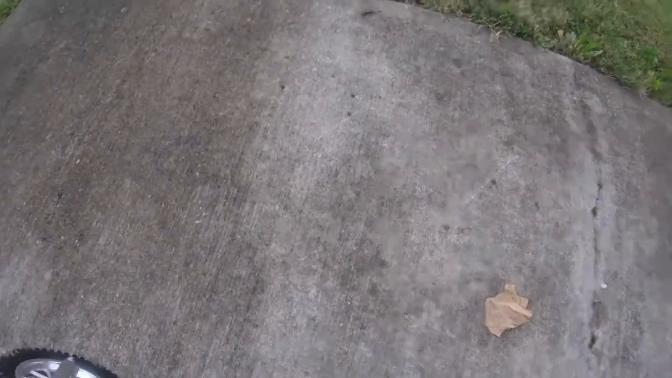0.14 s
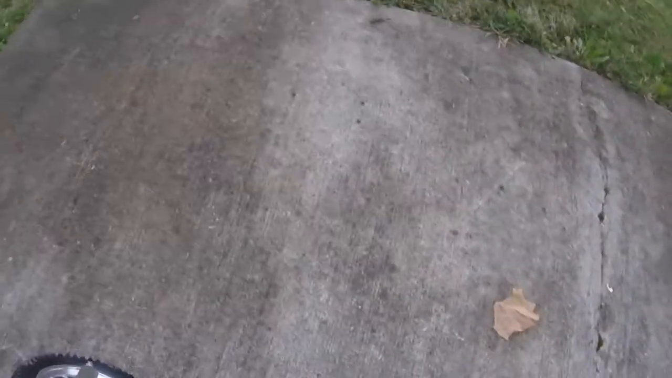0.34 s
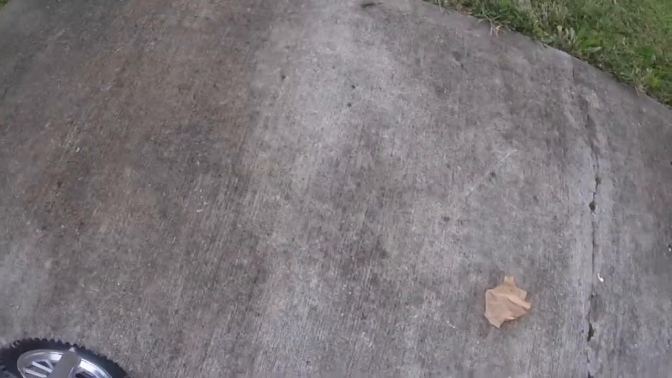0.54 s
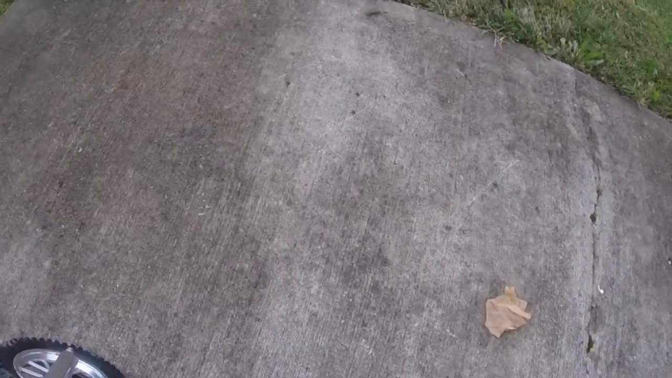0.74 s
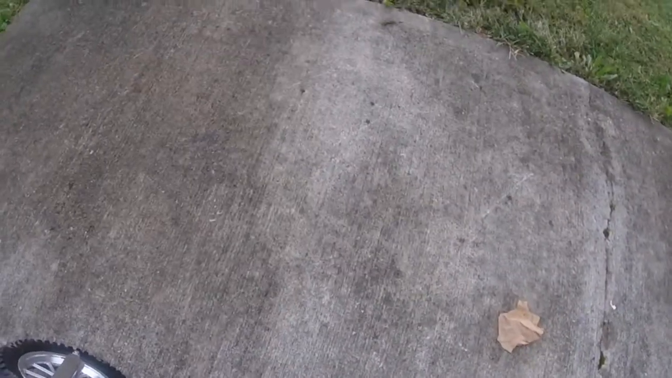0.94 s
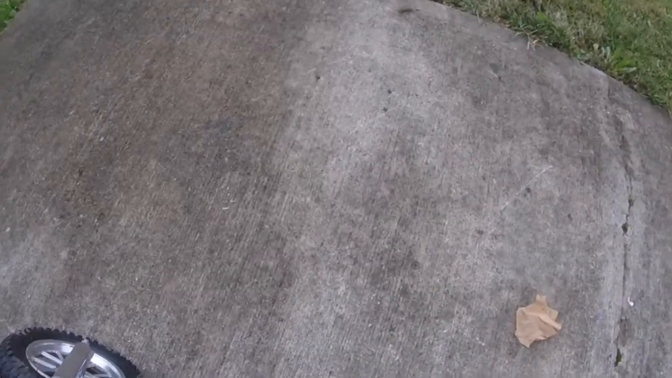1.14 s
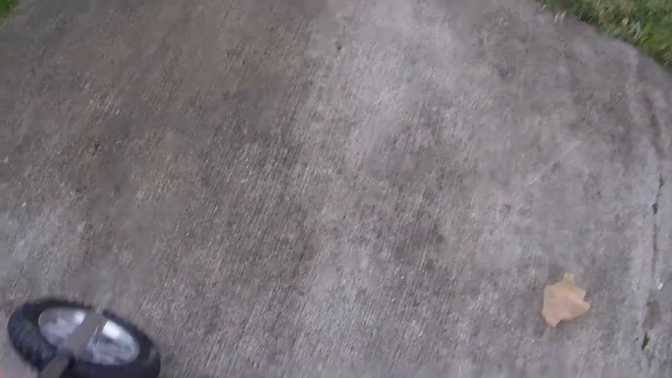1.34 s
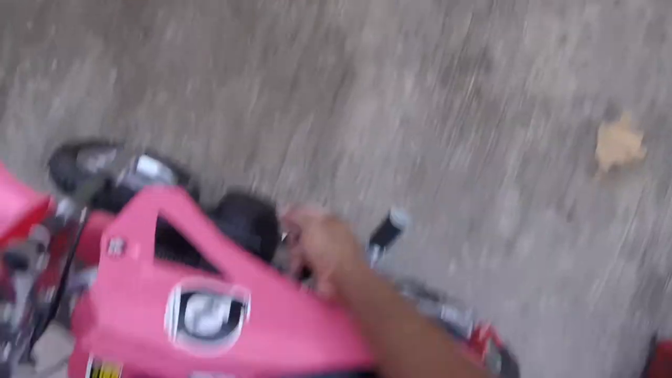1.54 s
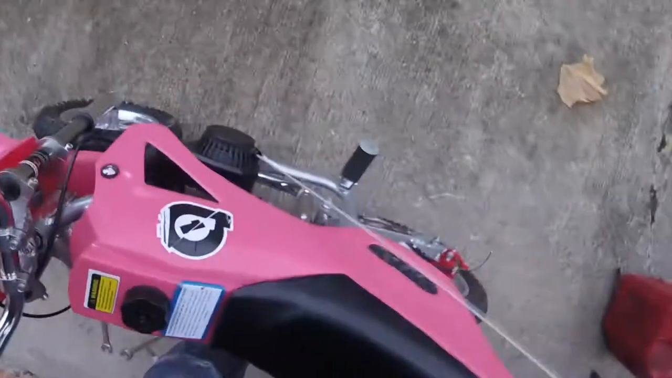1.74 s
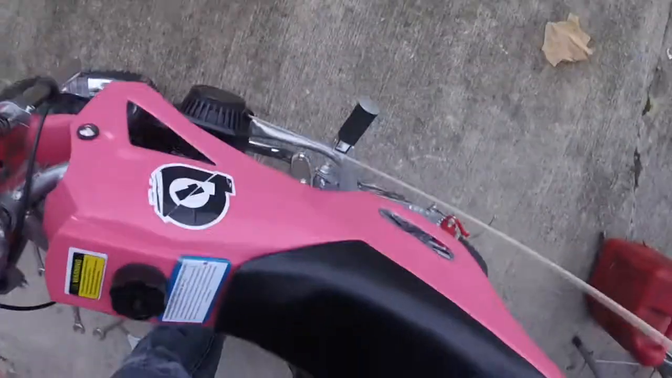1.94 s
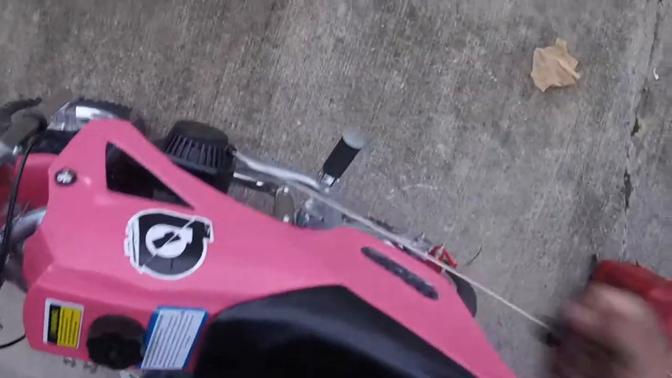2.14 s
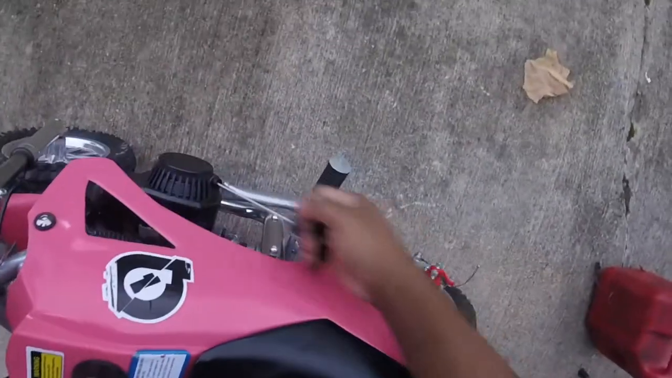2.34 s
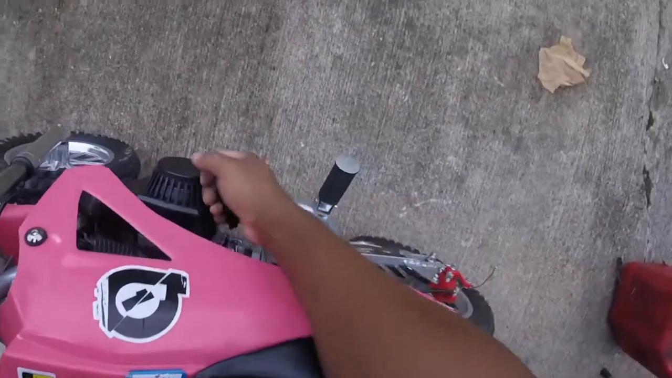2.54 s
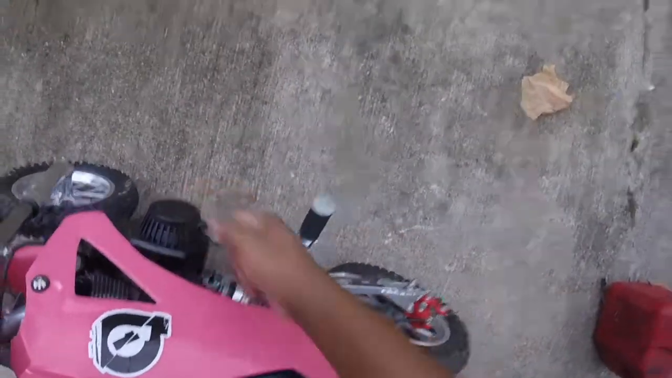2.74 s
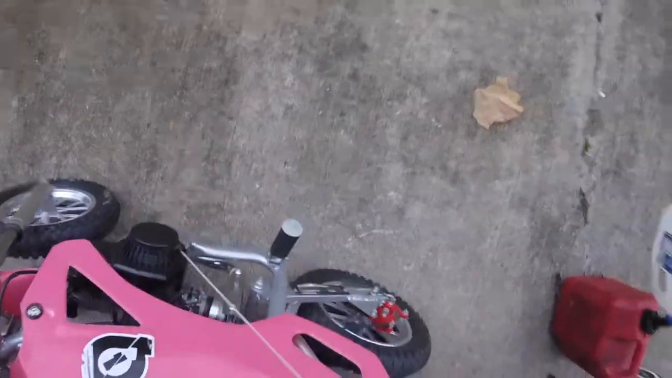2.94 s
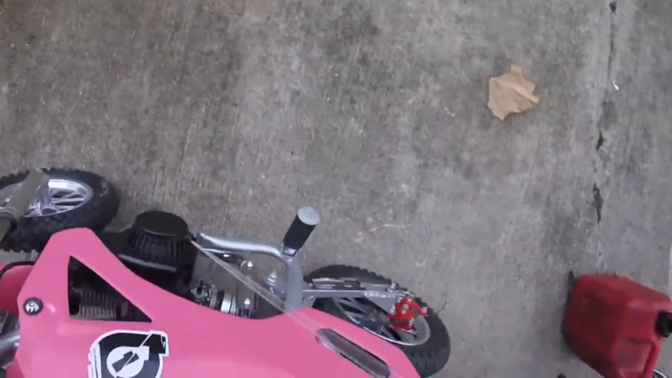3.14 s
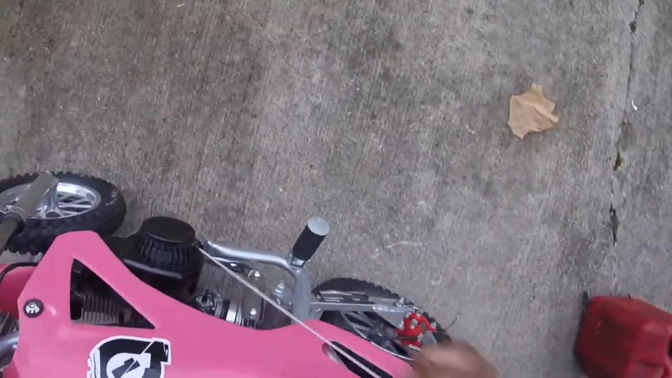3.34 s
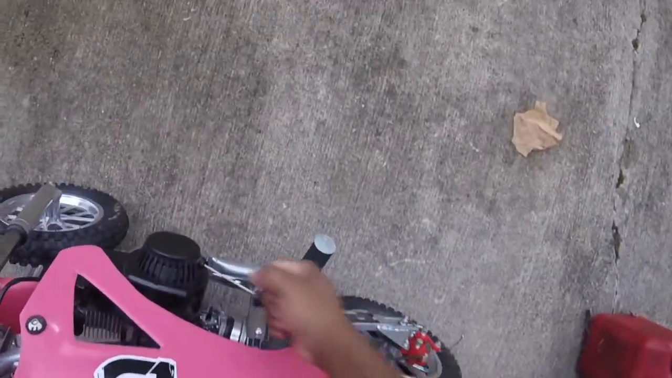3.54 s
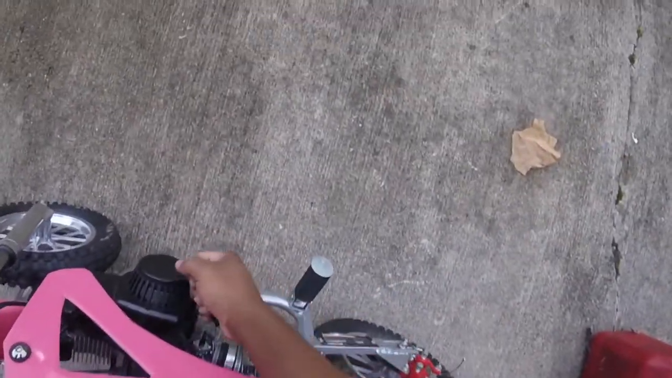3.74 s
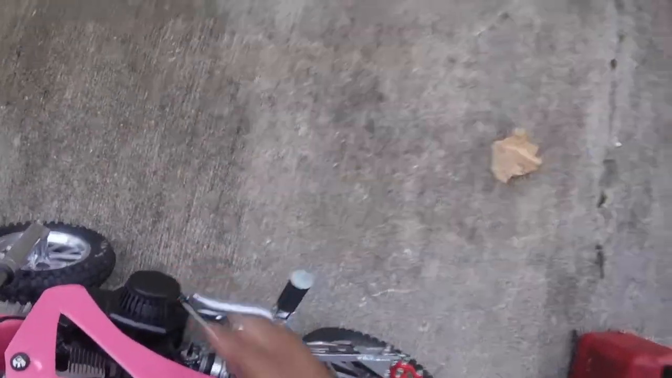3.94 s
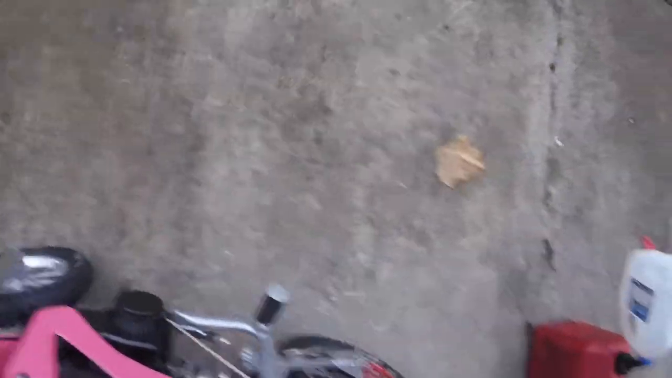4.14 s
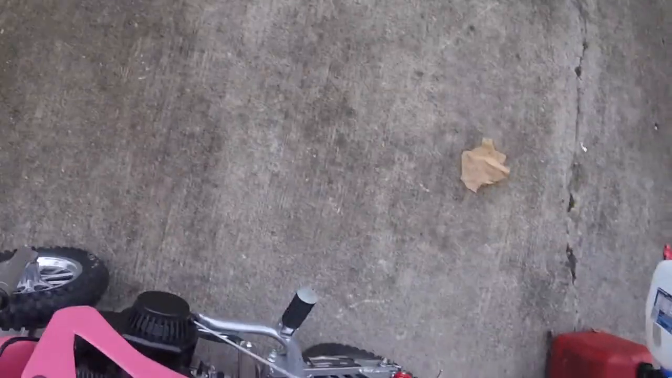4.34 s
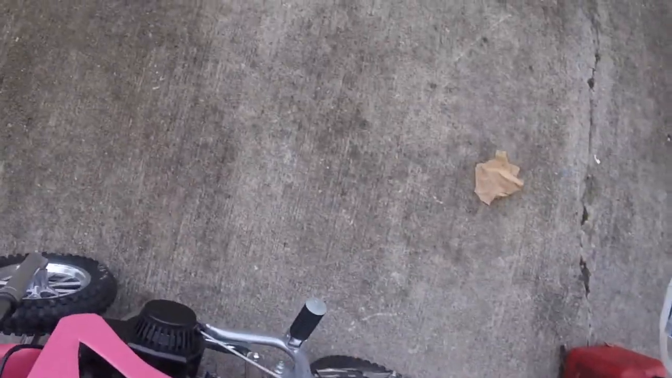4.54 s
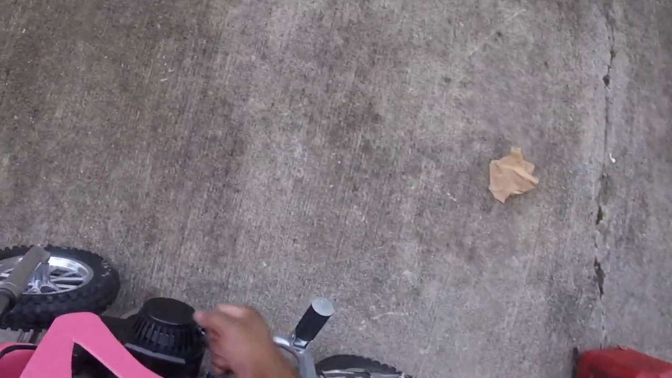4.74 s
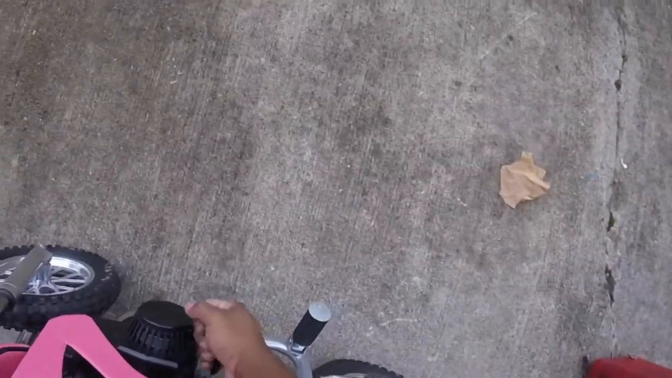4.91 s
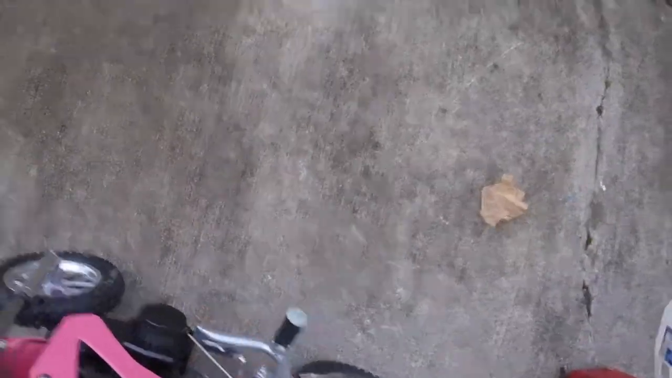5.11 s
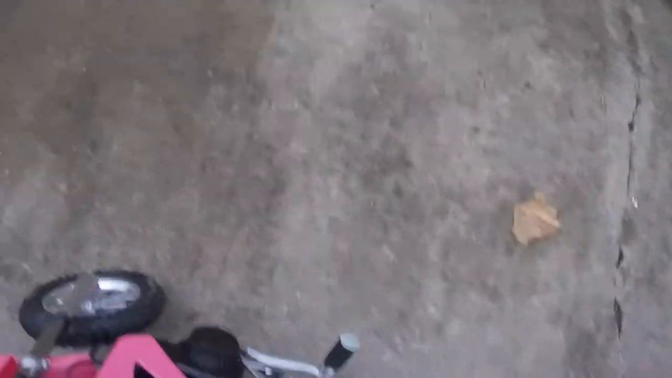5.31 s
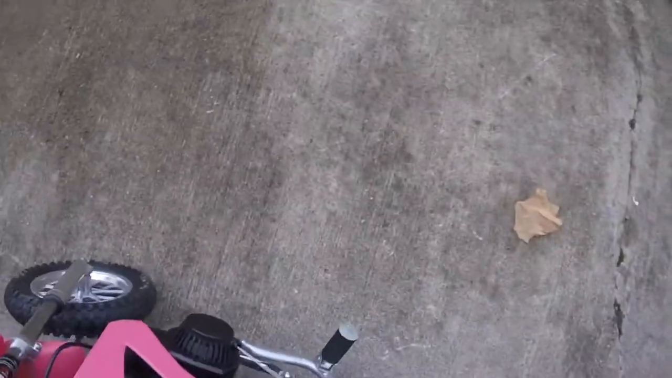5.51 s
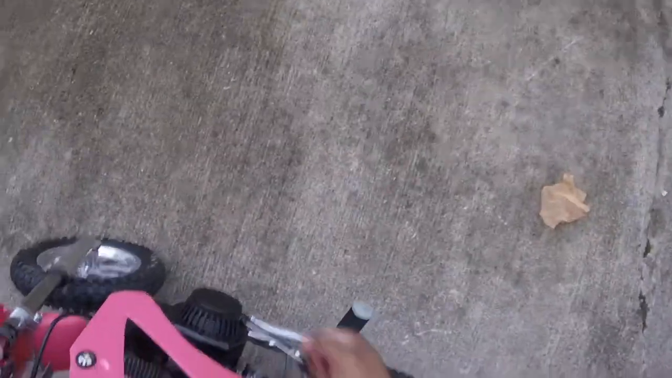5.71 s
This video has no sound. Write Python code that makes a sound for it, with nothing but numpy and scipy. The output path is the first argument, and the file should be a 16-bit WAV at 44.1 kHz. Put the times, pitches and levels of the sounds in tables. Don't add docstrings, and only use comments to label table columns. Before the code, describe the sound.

Close to the microphone on a concrete drive, a small dirt bike engine is pull-started five times. Each tug gives knocks, a rough rope rasp and a burst of blunt, hollow puffs, then a rattle and bright steel clicks slowing as the cord winds back. The engine never catches; the yard stays quiet with a light breeze.

```python
import sys
import numpy as np
from scipy import signal
from scipy.io import wavfile
from scipy.ndimage import uniform_filter1d

SR = 44100
rng = np.random.default_rng(int(sys.argv[2]) if len(sys.argv) > 2 else 0)


def nominal_scale(level):
    x = np.asarray(level, float) / 20
    return 10 ** x


def to_wav(sig):
    pcm = np.clip(np.atleast_2d(sig), -1, 1) * 32767
    pcm = np.round(pcm).astype(np.int16)
    wavfile.write(sys.argv[1], SR, pcm.T)


N = 258773


def evened(x):
    return x / np.sqrt(np.mean(x ** 2) + 1e-20)


def add(mix, s, sound):
    part = mix[max(round(s * SR), 0):][:len(sound)]
    part += sound[:len(part)]


def colour(x, points):
    f, db = np.transpose(points)
    bins_hz = abs(np.fft.fftfreq(4096, 1 / SR))
    log_gain = np.log(nominal_scale(np.interp(np.log(bins_hz + 1), np.log(f), db)))
    taps = np.fft.ifft(np.exp(np.conj(signal.hilbert(log_gain)))).real[:2048]
    return signal.oaconvolve(x, taps / np.linalg.norm(taps))[:len(x)]


def resonate(x, hz, width):
    r = np.exp(-np.pi * width / SR)
    angle = 2 * np.pi * hz / SR
    rung = signal.lfilter([np.sqrt(1 - r ** 2)], [1, -2 * r * np.cos(angle), r * r], x)
    return rung * 2 * np.sin(angle)


def ringing(modes, seconds):
    t = np.arange(round(seconds * SR)) / SR
    return sum(nominal_scale(db - 60 * t / t60) * np.cos(2 * np.pi * hz * t) for hz, db, t60 in modes)


def chatter(ms, swell, tail, tail_ms, grit_db):
    t = np.arange(4000) / SR * 1000
    ms = np.clip(ms, 1.3, 40)
    top = min(swell * ms, 3.8)
    spread = np.where(t < top, 1.24 * top, 1.06 * ms)
    main = np.exp(-((t - top) / spread) ** 2)
    shape = (1 - np.exp(-t / 1.44)) * (main + tail * np.exp(-t / tail_ms))
    noise, grit = rng.standard_normal((2, len(t)))
    return shape * noise * nominal_scale(grit_db * evened(uniform_filter1d(grit, size=30)))


# frequency in Hz, density in dB per Hz.
YARD = [(88, -19), (150, -0.5), (1010, -4.5), (1220, -5.5), (1720, -7), (4350, -30.5), (6610, -9),
        (10400, -26), (11600, -24), (15100, -28.5), (22000, -120)]


def quiet_yard():
    return nominal_scale(-55.5) * evened(colour(rng.standard_normal(N), YARD))


# middle in seconds, half width in seconds, level in dB.
GUSTS = [(.08, 0.15, -43), (1.2, 0.2, -44.5), (1.47, 0.082, -41.5), (2.43, 0.042, -34.5), (2.62, 0.23, -42),
         (3.7, 0.14, -42), (3.95, .05, -51), (4.7, 0.065, -35.5), (.2, 0.032, -29), (.58, 0.061, -38),
         (4.36, 0.048, -28.5), (5.46, 0.058, -30.5)]
# frequency in Hz, density in dB per Hz.
AIR = [(15, -3.5), (45, -2.5), (90, -12), (200, -18.5), (500, -26.5), (1300, -87.5), (3000, -120)]


def breeze():
    t = np.arange(N) / SR
    gust_db = np.max([db - 6 * ((t - s) / width) ** 2 for s, width, db in GUSTS], axis=0)
    still_db = -47.5
    return nominal_scale(np.maximum(gust_db, still_db)) * evened(colour(rng.standard_normal(N), AIR))


# start in seconds, level in dB, chatter in ms.
SLIPS = [(0, -37.5, 11), (.0168, -6, 4.5), (.0188, -1.5, 2), (.110, -34.5, 9.2), (.1255, -12.5, 2.3),
         (.3448, -16, 43), (.3875, -9, 3.7), (.405, -8, 7.1), (1.8608, -22, 9.2), (1.8827, -12, 7.2),
         (1.907, -13.5, 4.7), (2.7452, -9, 9.9), (3.034, -10, 12.5), (3.178, -15, 16), (3.899, -28, 8.7),
         (4.1992, -16, 44), (5.306, -12.5, 12)]
# time in seconds, level in dB,
# chatter in ms.
SKIPS = [(0.438, -9.5, 4), (0.4438, -1.5, 3.7), (.450, -3.5, 1.8), (0.4528, 1, 2.4), (.4575, 4.5, 1.1),
         (0.464, 3.5, 1.8), (0.4701, -5, 3.9), (0.4753, -1.5, 1.9), (.4775, -9, 1.8),
         (1.927, -10.5, 4.6), (1.938, -6.5, 5), (1.949, -1.5, 4.1), (1.96, -12.5, 5),
         (3.0584, 1, 3.6), (3.0629, 1, 1.5), (3.067, -9, 2.1), (3.077, -12, 2), (3.0855, -18, 2.9),
           (3.089, -2, 1.8), (3.102, -14, 1.6), (3.1105, -5, 2), (3.116, -8, 3), (3.1206, -5, 3.3),
           (3.132, -9, 3), (3.14, -2.5, 2.8), (3.144, 2.5, 0.81), (3.1506, 4.5, 1.3), (3.161, -13.5, 5),
         (4.2498, -5, 4.8), (4.2658, -6, 3.1), (4.2748, 7.5, 1.2),
         (5.33, 0.5, 4.4), (5.339, -5.5, 1.95), (5.345, -8.5, 2), (5.348, -12, 1.8), (5.355, 2.5, 2.7),
           (5.3648, -3, 2.9), (5.3663, -7, 1.2), (5.371, -11, 3)]
# start in seconds, level in dB, chatter in ms.
REWIND_1 = [(0.565, -8, 7.6), (0.585, -4, 4.7), (0.6075, -7, 8.3), (0.633, -10.5, 16.5), (0.67, -5, 6.5),
            (0.7086, -10, 11), (0.754, -9.5, 8.3), (0.7993, -7, 7.3), (0.848, -5, 5.2), (0.8938, -9, 12),
            (0.9483, -8, 7), (1.017, -8.5, 9.2), (1.1635, -7.5, 8.9)]
REWIND_2 = [(2.0742, -10, 5.4), (2.1018, -10.5, 5.1), (2.137, -15, 9.9), (2.168, -14, 13),
            (2.2008, -8.5, 7.6), (2.233, -9, 11.5), (2.2684, -10.5, 8.5), (2.3034, -8.5, 5.2),
            (2.338, -13, 10.6), (2.377, -10.5, 9.5), (2.4324, -9.5, 9), (2.494, -12, 8.1)]
REWIND_3 = [(3.2252, -15.5, 7.5), (3.266, -11.5, 8.2), (3.3122, -12, 5.8), (3.3512, -12, 8.2),
            (3.3975, -15, 8.7), (3.441, -12, 7.3), (3.492, -11, 5.2), (3.5415, -10.5, 7.8),
            (3.596, -12, 12), (3.6606, -11, 12.6), (3.743, -8, 9.1)]
REWIND_4 = [(4.3832, 0, 3.1), (4.3987, -8.5, 3.8), (4.419, -6.5, 6.6), (4.4463, -8, 9.5),
            (4.472, -1.5, 2.7), (4.4959, -7, 11.4), (4.526, -5.5, 6.4), (4.5554, -6.5, 5.2),
            (4.584, -10.5, 8.7), (4.616, -8.5, 15.4), (4.6509, -7, 7.2), (4.693, -8.5, 10.3),
            (4.7446, -7.5, 9.6), (4.8266, -7, 11.8)]
REWIND_5 = [(5.467, -3.5, 5.7), (5.4866, -3, 4.5), (5.504, 0.5, 4.6), (5.5268, -5.5, 4.1),
            (5.5455, -3.5, 6.8), (5.5711, -4.5, 6.6), (5.5972, -5.5, 5.6), (5.6264, -6.5, 8.7),
            (5.659, -5.5, 6.3), (5.691, -8, 10), (5.7271, -8.5, 10.7), (5.7801, -5, 6.1), (5.8306, -6, 9.3)]
REWINDS = (REWIND_1, REWIND_2, REWIND_3, REWIND_4, REWIND_5)
# time in seconds, rim strike in dB, loudest
# patch in Hz, cover in dB against the click.
LANDS = [(0.5683, 20.5, 6380, -14), (0.5868, 0, 6360, -22), (0.6087, -3, 6580, -30),
         (0.6356, -7, 6200, -14.5), (0.6711, 3, 6430, -41), (0.715, -9, 6170, -14),
         (0.7559, -12.5, 6600, -20.5), (0.8003, -6, 6600, -15.5), (0.8497, -3, 6550, -18),
         (0.8976, 6, 6580, -14.5), (0.9504, -11, 6540, -20), (1.0198, -5, 6540, -24.5),
         (1.1669, 3, 6150, -11),
         (2.0783, -14, 5930, -6), (2.1027, -14, 6720, -6), (2.1387, -16, 6100, 2),
           (2.1696, -14, 6230, -12), (2.206, -2, 6470, -7), (2.2389, -6, 6100, -4), (2.2714, -8, 6220, -2),
           (2.3088, 7, 6540, -14), (2.3402, -16, 6440, -2), (2.3821, -5, 6200, -2), (2.437, -15, 6300, -12),
           (2.4968, -7, 6190, -6),
         (3.2233, -14, 6030, -9.5), (3.2682, -10, 6380, -12.5), (3.3131, -8, 6240, -15),
           (3.356, -16, 6170, -15.5), (3.3999, -13, 6060, -13.5), (3.4423, -7, 6530, -13.5),
           (3.4927, 0, 6080, -14.5), (3.5446, -9, 6300, -13), (3.5975, -8, 6220, -17),
           (3.6678, -9, 6420, -15), (3.7456, 3.5, 6600, -9.5),
         (4.3848, 1, 6250, -12), (4.4237, -6, 6460, -17), (4.4457, -16, 6730, -17),
           (4.4741, -7, 6310, -15), (4.5006, -10, 6320, -33), (4.5275, -2, 6350, -12),
           (4.5594, -5, 6730, -15), (4.5864, -8, 6700, -13), (4.6178, -13, 6450, -17.5),
           (4.6517, -11, 6330, -12), (4.6956, -7, 6620, -13.5), (4.748, -12, 6280, -14),
           (4.8303, 4, 6490, -15),
         (5.4698, 1.5, 6370, -23), (5.4883, -3, 6480, -21), (5.5062, 0, 6430, -33),
           (5.5277, -1, 6800, -18), (5.5506, 2, 6430, -23), (5.5741, -2, 6400, -21), (5.601, -4, 6090, -15),
           (5.6304, -11, 6300, -13), (5.6604, -6, 6320, -22), (5.6928, -11, 6320, -9),
           (5.7302, -8, 6380, -8.5), (5.7826, -5, 6210, -16), (5.833, 4.5, 6440, -12)]
# spring rasp in dB, cup whine in dB,
# cover in dB against the click.
GRIP = [
    (-35.5, -23, 4),
    (-30.5, -26.5, 2),
    (-37.5, -32.5, 6),
    (-33.5, -26, 4.5),
    (-31.5, -26.5, 3.5),
]
PATCH_MIDDLE_HZ = 6380


def clicks():
    skips = SKIPS
    loose = SLIPS + [(s - 0.00093, db + 1, ms) for s, db, ms in skips]
    rows = []
    for (s, db, ms), (place, uneven) in zip(loose, rng.uniform(-1.1, 1, (len(loose), 2))):
        rows.append((s, db, ms, db, PATCH_MIDDLE_HZ + 200 * place, -17 - 12 * uneven))
    lands = LANDS
    for run, (_, _, grip_db) in zip(REWINDS, GRIP):
        for s, db, ms in run:
            _, rim_db, hz, cover_db = min(lands, key=lambda land: abs(land[0] - s))
            rows.append((s, db - 1, ms, rim_db, hz, cover_db + grip_db))
    return rows


# frequency in Hz, level in dB, t60 in
# seconds.
CUP = [(538, -31, .22), (1750, -40, .25), (2035, -43, .5), (3424, -38, .3), (3849, -41, .3),
       (4290, -38, .15), (4710, -40, .25), (5670, -28, .08), (5880, -20, .07), (6030, -14, .05),
       (6190, -15, .05), (6300, -14, .04), (6438, -12, .04), (6535, -20, .09), (6740, -16, .045),
       (7055, -20, .1),
       (5103, -48, .35), (7354, -30, .1), (7780, -25, .06), (8460, -29, .06), (9095, -20, .06),
          (9920, -26, .06), (10500, -27, .04), (10850, -21, .04), (11235, -34, .11), (11900, -18, .07),
          (12950, -31, .09), (13400, -36, .05)]
# time in seconds, treble in dB, long ring in dB.
FACING = [(0, -9, -24), (1.2, 2, -14), (1.95, 9, -6), (2.2, 10.5, -2), (2.5, 7, 2), (2.75, -1, 7.5),
          (3.75, 2, -3), (4.3, 0.5, -21), (4.83, 1, 5), (5.35, 2, 1), (5.87, 1, -1.5)]
# frequency in Hz, width in Hz, level in dB.
HOUSING = [(760, 220, -7), (1430, 110, -6), (2300, 250, -10), (2990, 200, -8), (3850, 190, 0),
           (4350, 260, 0)]
# frequency in Hz, density in dB per Hz.
TICK = [(300, -33.5), (3000, 5), (5500, 13), (7000, -26), (9000, 7), (11500, 4), (13200, -20),
        (15000, -30.5), (20000, -91)]
# frequency in Hz, density in dB per Hz.
ROPE = [(260, -32), (450, -2.5), (591, -1.5), (715, 7), (1320, -5), (1430, 5), (2460, -7.5), (6560, -6.5),
        (11600, -22.5), (15100, -52.5), (22000, -120)]


def ratchet():
    patch, cover, strike, *spots = np.zeros((9, N))
    rows = clicks()
    for (s, db, ms, rim_db, hz, cover_db), spot in zip(rows, rng.integers(0, len(spots), len(rows))):
        hit = chatter(ms, swell=0.54, tail=0.29, tail_ms=12.5, grit_db=1.5)
        add(spots[spot], s, nominal_scale(db) * hit)
        add(strike, s + .002, nominal_scale([rim_db + 23.0]))
        opposite = nominal_scale(-5) * resonate(hit, 2 * PATCH_MIDDLE_HZ - hz, 150)
        add(patch, s, nominal_scale(db) * (resonate(hit, hz, 150) + opposite))
        add(cover, s, nominal_scale(db + cover_db) * hit)
    s, *facing = np.transpose(FACING)
    treble_db, ring_db = (np.interp(np.arange(N) / SR, s, column) for column in facing)

    modes = CUP
    rung = np.zeros(N)
    for x, scatter_db in zip(spots, 4 * rng.standard_normal((len(spots), len(modes)))):
        cup = ringing([(hz, db + d, t60) for (hz, db, t60), d in zip(modes, scatter_db)], .35)
        rung += signal.oaconvolve(x, cup / np.linalg.norm(cup))[:N]
    treble = signal.sosfilt(signal.butter(4, 7900, "high", fs=SR, output="sos"), rung)
    rung += nominal_scale(treble_db - 4.0) * treble

    rim = resonate(nominal_scale(ring_db) * strike, 6138, 11)
    boxy = sum(nominal_scale(db) * resonate(cover, hz, width) for hz, width, db in HOUSING)
    tick = nominal_scale(treble_db) * colour(sum(spots), TICK)
    whole = nominal_scale(-14.5) * rung + nominal_scale(-26.0) * rim + nominal_scale(-12) * patch + nominal_scale(-23.0) * tick
    whole += nominal_scale(-19.0) * boxy + nominal_scale(-22.0) * colour(cover, ROPE)
    return signal.sosfilt(signal.butter(2, 450, "high", fs=SR, output="sos"), whole)


# frequency in Hz, level in dB, t60 in seconds.
FRAME = [(538, 0, .21), (640, -12, .2), (1750, -12, .25), (2035, -15, .45), (3424, -20, .25),
         (4290, -19, .25), (4710, -21, .35)]
# frequency in Hz, level in dB, t60 in seconds.
EDGE = [(6094, -4, .24), (6535, -6, .2), (7058, 0, .14), (9098, -6, .12), (11000, 0, .16), (11237, 6, .2),
        (11890, 14, .2)]
# time in seconds, frame in dB, cup edge in dB.
LAST = [
    (.019, -64, -52),
    (1.019, -50, -44),
    (1.166, -40, -40),
    (2.496, -48, -44),
    (2.747, -50, -44),
    (3.746, -42, -40),
    (4.83, -48, -42),
    (5.833, -48, -42),
]


def afterring():
    out = np.zeros(N)
    for s, frame_db, edge_db in LAST:
        sound = nominal_scale(frame_db) * ringing(FRAME, .35) + nominal_scale(edge_db) * ringing(EDGE, .35)
        add(out, s, sound * np.minimum(np.arange(len(sound)) / 200, 1))
    return out


# first turn in seconds, strength in dB, pace (1 = usual),
# stall before the last two turns in seconds.
PULLS = [
    (.3258, -2.5, 1, .002),
    (1.7984, 2.5, 1.069, .007),
    (2.9487, 0, .99, -.001),
    (4.1335, -1, 1.018, .0045),
    (5.2218, -.6, .975, .008),
]
# time from first turn in seconds, level in dB.
STROKE = [
    (-.3, -61.5),
    (-.2, -38),
    (-.14, -36),
    (-.08, -28),
    (-.02, -27.5),
    (0.068, -16.5),
    (.15, -28.5),
    (.23, -37),
    (.33, -63),
]
TAUT_S = [.11, 1.622, 2.698, 3.899, 4.974]
# start in seconds, length in seconds, whine in dB.
WHIRLS = [
    (0.427, 0.035, -15.5),
    (1.926, 0.058, -21),
    (3.055, 0.091, -11.5),
    (4.244, 0.06, -13),
    (5.34, 0.028, -6),
]


def motion():
    t, (s, db) = np.arange(N) / SR, np.transpose(STROKE)
    slack_db = -8
    efforts = [np.interp(t, start + pace * s, db + strength) + slack_db * (t < taut)
               for (start, strength, pace, _), taut in zip(PULLS, TAUT_S)]
    effort_db = np.max(efforts, axis=0)
    rasp_db, whine_db = effort_db, 0.68 * effort_db - 15
    for run, (spring_db, cup_db, _) in zip(REWINDS, GRIP):
        at = np.array(run)[:, 0]
        octaves = np.log2(1 / np.diff(at) / 30)
        times = np.r_[at[0] - 0.079, (at[1:] + at[:-1]) / 2, at[-1] + 0.11]
        speed = np.interp(t, times, np.r_[-4, octaves, -4], left=-9, right=-9)
        rasp_db = np.maximum(rasp_db, spring_db + 5.5 * speed)
        whine_db = np.maximum(whine_db, cup_db + 13 * speed)
    for start, length, cup_db in WHIRLS:
        rise_db, fall_db = 4000 * np.maximum(start - t, 0), 1500 * np.maximum(t - start - length, 0)
        whine_db = np.maximum(whine_db, cup_db - rise_db - fall_db)
    settle_db = 94 * t
    shake_db = np.maximum.accumulate(0.81 * effort_db - 4.5 + settle_db) - settle_db
    return rasp_db, np.maximum(shake_db, rasp_db - 6), whine_db


# frequency in Hz, density in dB per Hz.
RUMBLE = [(12, -14), (20, 20.5), (81, 2), (206, 2), (263, 7), (420, -10.5), (520, 0), (600, -23.5),
          (780, -17), (1320, -120)]


def drag():
    rope_db, rumble_db, whine_db = motion()
    fibres, shaking, rubbing, lumps, slips = rng.standard_normal((5, N))
    lumps_db = 2.8 * evened(uniform_filter1d(lumps, size=260))
    slips_db = 3.4 * evened(uniform_filter1d(slips, size=36))
    grain = nominal_scale(lumps_db + slips_db)
    wander = nominal_scale(5.0 * evened(uniform_filter1d(rng.standard_normal((len(HOUSING), N)), size=900)))
    boxy = sum(w * np.sqrt(1000 / hz) * resonate(fibres * grain, hz, width)
               for (hz, width, _), w in zip(HOUSING, wander))
    rasp = evened(evened(colour(fibres * grain, ROPE)) + nominal_scale(-1.0) * evened(boxy))
    rumble = nominal_scale(np.minimum(rumble_db, -26) - 4.5) * evened(colour(shaking, RUMBLE))
    whine = evened(resonate(resonate(rubbing * grain, 6620, 1050), 6490, 410))
    return nominal_scale(rope_db + 0.98) * rasp + rumble + nominal_scale(whine_db - 5.0) * whine


# time in seconds, peak in dB,
# ring in Hz, scrape in ms.
BITES = [(.204, -17, 1500, 23), (0.2275, -1.5, 1790, 7.4), (0.251, -8.5, 1940, 12), (0.262, -7, 2270, 14.5),
         (0.279, -8.5, 1400, 11), (.318, -15, 2650, 11), (1.785, -14.5, 2890, 8), (1.815, -19, 3600, 1.7),
         (1.687, -8, 1840, 10), (1.7375, -6, 2700, 1.4), (1.745, -5, 2090, 4.6), (1.829, -23, 1260, 7),
         (1.869, -7, 1540, 7.1), (1.622, -14, 490, 7.8), (2.833, -13.5, 885, 7.4), (2.988, -6, 1380, 8.1),
         (2.841, -3, 1940, 3.7), (2.851, -9, 1700, 3.4), (2.8659, -4, 1910, 6.3), (2.875, -9, 2980, 8.9),
         (2.8912, -3.5, 1910, 7.2), (2.9065, -6, 1480, 4.5), (2.937, -14, 1390, 6.8), (2.99, -10, 730, 41),
         (4.014, -16, 1510, 16), (4.025, -6, 2000, 11.2), (4.043, -12, 2520, 4.9), (4.076, -5, 1900, 6.6),
         (4.096, -8.5, 1120, 5.1), (4.123, -32, 1400, 7.4), (4.148, -12, 1100, 10.4),
         (5.106, -13, 2900, 63), (5.118, -4.5, 2000, 7.8), (5.167, -7, 1820, 5.4),
         (5.185, -11.5, 2640, 7.4), (5.211, -17, 1130, 14)]
# time in seconds, peak in dB, ring in Hz.
TAPS = [(0.128, -17, 1420), (0.148, -10.5, 674), (1.186, -17, 1455), (1.525, -22, 2234), (1.567, -25, 950),
        (1.625, -12, 900), (1.657, -22, 2400), (2.011, -27, 2310), (5.394, -15, 3900), (5.426, -20, 2200),
        (2.699, -18.5, 4600), (3.852, -38, 1140), (2.560, -14.5, 990), (2.571, -18.5, 1500),
        (2.698, -28.5, 830), (2.739, -12, 3900), (2.818, -15, 3000), (3.577, -22, 2260),
        (3.902, -17.5, 3620), (3.923, -19, 1460), (3.956, -27, 1900), (3.971, -41, 1320),
        (4.357, -18.5, 1790), (4.813, -29, 3750), (4.975, -23, 794), (5.015, -15.5, 3120),
        (5.05, -18, 1700), (5.072, -14.5, 3080)]
# time in seconds, peak in dB, width in ms.
THUDS = [
    (1.625, 9, 0.35),
    (1.6353, -6, 0.41),
    (1.6414, -1.5, 0.94),
]
# frequency in Hz, density in dB per Hz.
SCRAPE = [(59, -11), (100, -14), (281, 5.5), (576, -6.5), (746, 8.5), (1250, 1.5), (1860, 4.5), (2230, 1.5),
          (5400, -0.5), (6530, 1.5), (7600, -9.5), (8970, -10.5), (11600, -45), (15100, -50), (22000, -120)]


def knocks():
    wide, tone = np.zeros((2, N))
    tap_ms = 4
    for s, db, hz, ms in BITES + [(*tap, tap_ms) for tap in TAPS]:
        hit = nominal_scale(db) * chatter(ms, swell=.2, tail=.2, tail_ms=18, grit_db=4.0)
        add(wide, s - .0015, nominal_scale(0.11 * db) * hit)
        add(tone, s - .0015, resonate(hit, hz, 160))
    for s, db, ms in THUDS:
        u = np.arange(-200, 200) / SR * 1000 / ms
        add(tone, s - 200 / SR, -nominal_scale(db + 7.0) * (1 - 1.35 * u ** 2) * np.exp(-u ** 2))
    return nominal_scale(-11.5) * colour(wide, SCRAPE) + nominal_scale(-20.5) * tone


# pop in dB, second port in dB, lowest mode in dB.
TURNS = [
    (-1.5, -5.5, 3.5),
    (0, 4.5, -2.5),
    (1.5, -26, -4),
    (0, 1.5, -1.5),
    (-12.5, -13, 10),
    (-8, -12.5, -4.5),
]
# time of each turn after the first, in seconds.
TURN_S = [0, .0335, .0612, .089, .121, .18]
STALLED = [0, 0, 0, 0, 1, 1]


def puffs():
    return [(start + pace * s + stall * share, db + pop_db, db + second_db, low_db)
            for start, db, pace, stall in PULLS
            for s, share, (pop_db, second_db, low_db) in zip(TURN_S, STALLED, TURNS)]


# frequency in Hz, level in dB, t60 in seconds.
PIPE = [(190, -7.5, 0.027), (339, -8, 0.14), (367, -5.5, 0.093), (259, -19.5, 0.17), (459, -17.5, 0.057),
        (620, -24, .025)]


def exhaust():
    t = np.arange(-200, 200) / SR
    blow = np.exp(-(t / 0.00088) ** 2) - 0.44 * np.exp(-((t + 0.0024) / 0.0011) ** 2)
    out = np.zeros(N)
    chances = rng.standard_normal((len(PULLS) * len(TURNS), 2))
    for (s, db, second_db, low_db), (detune, late) in zip(puffs(), chances):
        modes = [(hz * (1 + 0.03 * detune), d + low_db * (hz == PIPE[0][0]), t60) for hz, d, t60 in PIPE]
        pipe = ringing(modes, 0.18)
        pop = np.convolve(pipe, blow) / 48
        u = np.arange(len(pipe)) / SR
        heave = -.28 * np.sin(2 * np.pi * 56 * u) * nominal_scale(-60 * u / .15) * (1 - np.exp(-u / .003))
        add(out, s + t[0], nominal_scale(db) * pop)
        add(out, s + t[0] + 0.0103 + 0.00041 * late, nominal_scale(second_db - 8.0) * pop)
        add(out, s, nominal_scale(db) * heave)
    return out


def scene():
    near = ratchet() + knocks() + exhaust() + drag() + afterring()
    bounce = np.zeros(N)
    add(bounce, .0031, nominal_scale(-27.0) * near)
    return (near + bounce + quiet_yard() + breeze())[None]


def top_cut(x):
    return signal.sosfilt(signal.butter(12, 13800, fs=SR, output="sos"), x)


# frequency in Hz, gain in dB.
MIC = [(100, 0), (11400, 0), (11900, -24), (13100, -19), (14500, -32), (22000, -50)]
# frequency in Hz, density in dB per Hz.
HISS = [(3000, -17), (9000, -3), (12400, 6), (13000, -27), (22000, -78)]


def record(dry):
    heard = nominal_scale(-2.8) * colour(dry[0], MIC)[None]
    heard = heard + nominal_scale(-77.5) * evened(colour(rng.standard_normal(N), HISS))
    return top_cut(np.clip(heard, -.99, .99))


dry = scene()
out = record(dry)
to_wav(out)
```